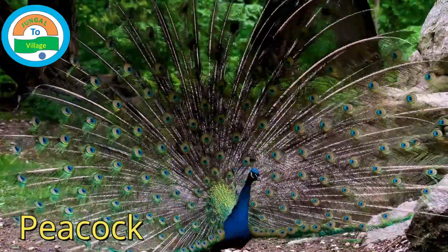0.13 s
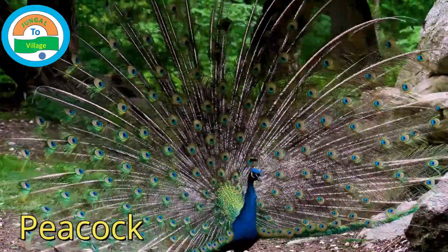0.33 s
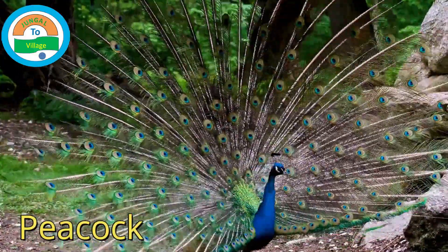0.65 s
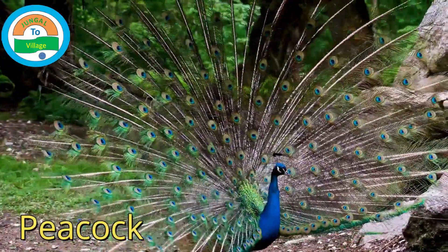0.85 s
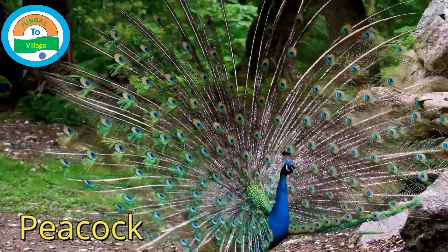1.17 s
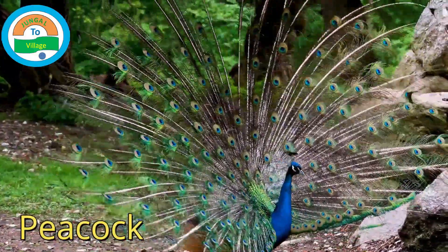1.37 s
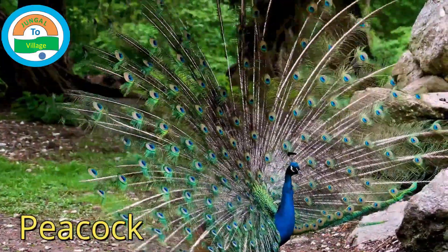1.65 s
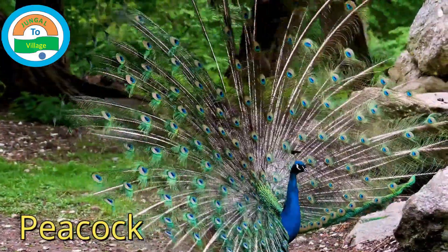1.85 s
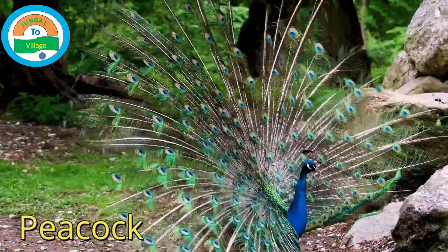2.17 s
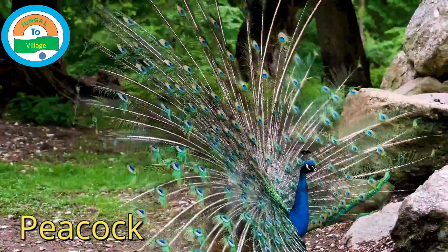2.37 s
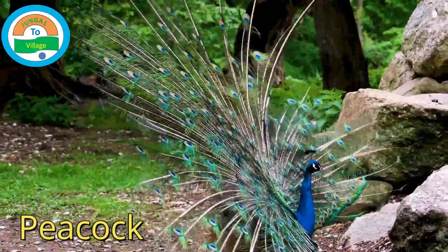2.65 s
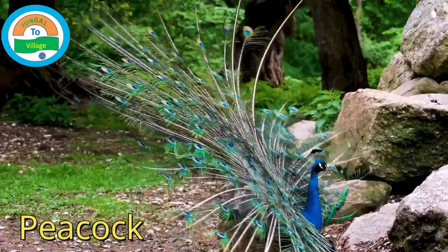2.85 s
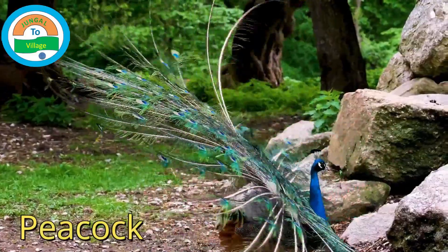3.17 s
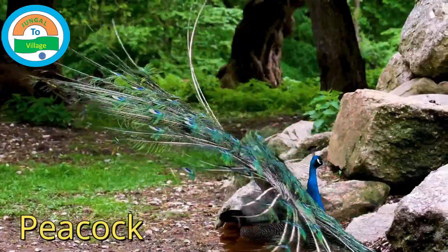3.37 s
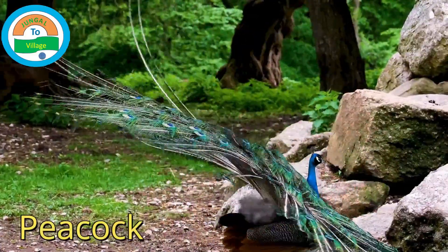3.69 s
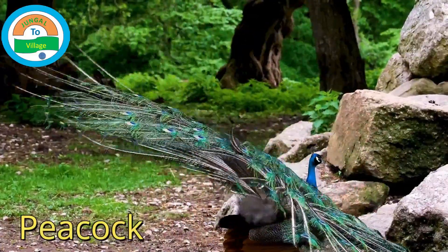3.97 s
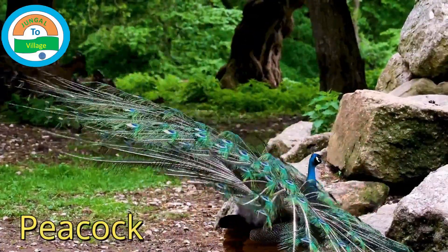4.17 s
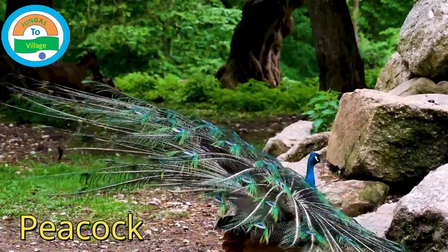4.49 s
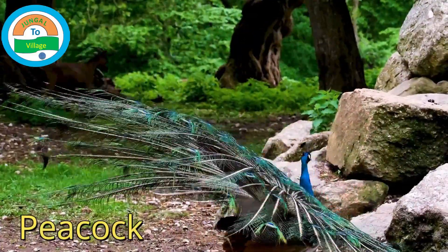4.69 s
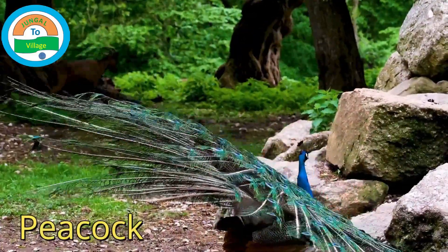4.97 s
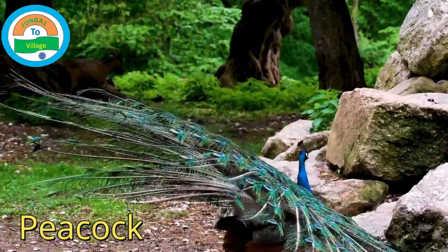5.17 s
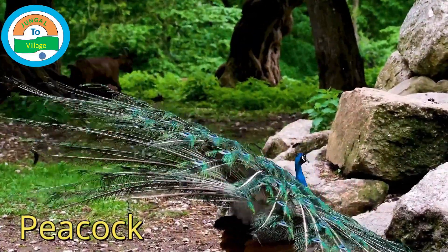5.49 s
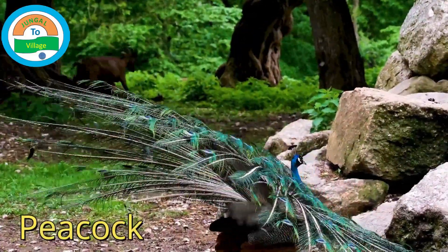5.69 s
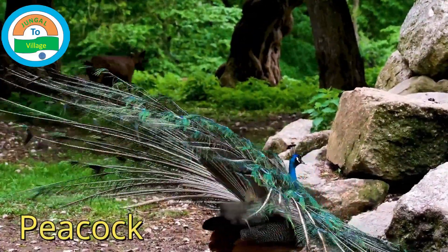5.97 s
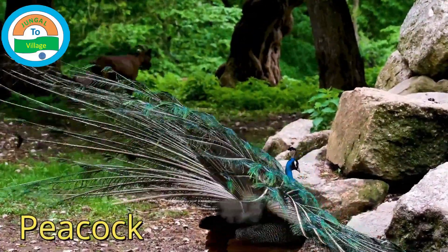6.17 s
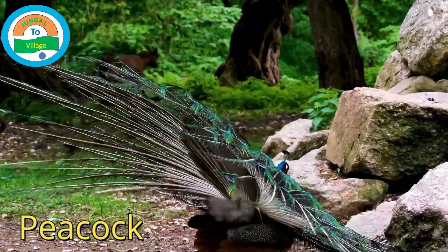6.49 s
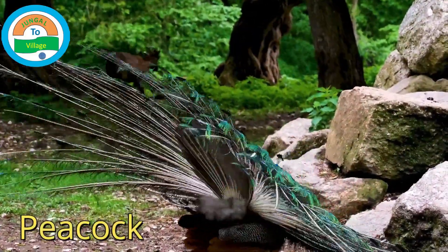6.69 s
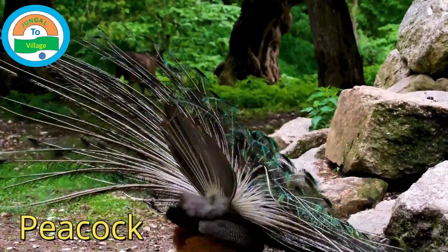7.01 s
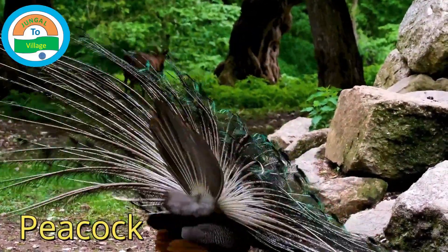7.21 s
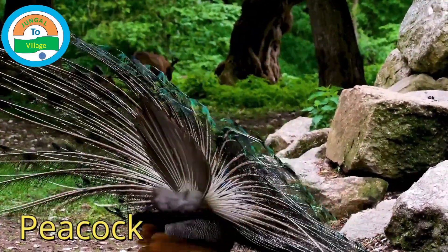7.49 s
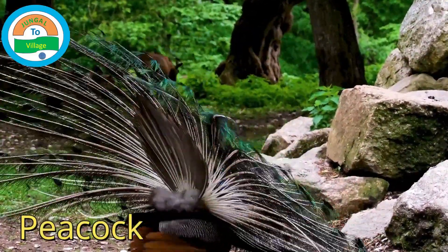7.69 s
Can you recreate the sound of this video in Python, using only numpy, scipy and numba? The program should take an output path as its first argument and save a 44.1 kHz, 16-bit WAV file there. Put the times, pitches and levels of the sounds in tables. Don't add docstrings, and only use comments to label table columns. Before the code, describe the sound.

Faint songbirds whistle over a soft park hush with light wind rumble on the microphone. After a dull tick, a peacock calls six times, almost once a second, each cry starting low, leaping higher and bending down, with trees echoing. Another tick, then one longer, hoarse, quivering cry sounds closer and drier, cut off at the end.

```python
import sys
import numpy as np
from scipy import signal
from scipy.io import wavfile
from scipy.ndimage import uniform_filter1d, map_coordinates
from numba import njit

SR = 44100
rng = np.random.default_rng(int(sys.argv[2]) if len(sys.argv) > 2 else 0)


def linear_from_db(decibels):
    return 10 ** (np.asarray(decibels, float) / 20)


def store_wav(level_fs):
    pcm = np.round(np.clip(np.atleast_2d(level_fs), -1, 1) * 32767)
    wavfile.write(sys.argv[1], SR, pcm.T.astype(np.int16))


N = 346185


def columns(rows, t):
    s, *cols = np.transpose(rows)
    return [np.interp(t, s, c) for c in cols]


def colour_db(table, hz):
    table_hz, table_db = np.transpose(table)
    return np.interp(np.log(hz), np.log(table_hz), table_db)


def walk(rate, size):
    k = max(int(SR / rate), 1)
    held = np.repeat(rng.standard_normal(N // 20), k)[:size]
    return 1.3 * uniform_filter1d(uniform_filter1d(held, k), k)


def bandpass(x, lo_hz, hi_hz):
    return signal.sosfilt(signal.butter(2, [lo_hz, hi_hz], "bandpass", fs=SR, output="sos"), x)


def noise_band(size, lo_hz, hi_hz):
    y = bandpass(rng.standard_normal(size), lo_hz, hi_hz)
    return y / np.std(y)


def span(rows):
    a, b = int(rows[0][0] * SR), min(int(rows[-1][0] * SR), N)
    t = np.arange(a, b) / SR
    runs_on = b >= N - 2
    edge = np.clip(np.minimum((t - t[0]) / .012, (t[-1] - t + runs_on) / .025), 0, 1)
    return slice(a, b), t, edge


def cry(where, edge, hz, levels, jitter=0.0016, shimmer_db=0.83, drift_db=1.5, breath_db=-42, rasp=0.):
    size = len(hz)
    phase = 2 * np.pi * np.cumsum(hz * (1 + jitter * walk(150.9, size))) / SR
    voice = 0
    for k, db in enumerate(levels, 1):
        wobble_db = shimmer_db * k / 2 * walk(59.87, size) + drift_db * walk(21.92, size)
        voice = voice + np.sqrt(2) * linear_from_db(db + wobble_db) * np.sin(k * phase + 0.639 * k * k)
    breath = linear_from_db(levels[1] + breath_db) * noise_band(size, 1000, 1520)
    jump = np.clip(uniform_filter1d(np.gradient(hz), size=1865) * SR / 1500, rasp, 1) ** 2
    breath = breath + jump * linear_from_db(levels[1] - 24) * noise_band(size, 1900, 4800)
    out = np.zeros(N)
    out[where] = edge * (voice + breath)
    return out


def arc(when, manner, colour):
    # (frequency [Hz], level [dB])
    pipe = [(620, -40.5), (700, -39.5), (830, -23.5), (1250, -17), (1650, -13.5), (1900, -19),
            (2200, -15.5), (2480, -21)]
    # (frequency [Hz], level [dB])
    beak = [(2550, -23.5), (2780, -20), (2960, -38), (3180, -28), (3450, -33), (3640, -29), (4200, -28.5),
            (6000, -34.5)]
    beak_shut_db = [-2.5, -18, -13.5, -2, 7, -3]
    start, jump, end, ledge_hz, crest_hz = when
    jump_s, sag_hz, power, ledge_db, arc_db = manner
    start_hz, held_s, third_db, fourth_db, end_db = colour
    climb_s, attack_s, release_s, last_drop_s = .07, 0.046, 0.093, 0.034
    where, t, edge = span([(start,), (end,)])

    def ramp(s, length):
        return np.clip((t - s) / length, 0, 1)

    up = ramp(jump, jump_s)
    sag_start = jump + jump_s + held_s
    sag = ramp(sag_start, end - sag_start) ** power
    hz = start_hz + (ledge_hz - start_hz) * ramp(start, climb_s)
    hz = hz + 20.8 * np.minimum(t - jump, 0)
    hz = hz + (crest_hz - ledge_hz) * np.sqrt(up * up * (3 - 2 * up))
    hz = hz - sag_hz * sag - 30.3 * ramp(end - last_drop_s, last_drop_s)
    hz = uniform_filter1d(hz, size=900)

    effort_db = ledge_db + (arc_db - ledge_db) * up
    effort_db = effort_db - 9.5 * (1 - ramp(start, attack_s)) - 9 * ramp(end - release_s, release_s)
    ledge_fade = ramp(start + attack_s, jump - start - attack_s) * (1 - ramp(jump, jump_s / 4))
    effort_db = effort_db - 2 * ledge_fade + 1.5 * np.sin(np.pi * up) - 3.5 * sag

    levels = [colour_db(pipe, k * hz) for k in range(1, 4)]
    levels[0] = levels[0] - 2.5 * sag
    opened = np.clip(sag / 0.27, 0, 1)
    shut = np.clip((up - 0.26) / 0.17, 0, 1) - 0.85 * opened
    for k, db in enumerate(beak_shut_db):
        levels.append(colour_db(beak, (k + 4) * hz) - 4.5 * k + db * shut)
    flare_db = 0.5 * np.exp(-((up - 0.19) / 0.12) ** 2)
    levels[4:7] = [db + flare_db for db in levels[4:7]]
    levels[2] = levels[2] + third_db * (up - opened) + end_db * sag
    levels[3] = levels[3] + fourth_db * (up - opened) + end_db * sag
    return where, edge, hz, [db + effort_db for db in levels]


def short_cries():
    # (start [s], jump [s], end [s], ledge [Hz], crest [Hz])
    cry_times = [
        (0.845, 0.977, 1.411, 645.5, 817.8),
        (1.759, 1.902, 2.296, 690.6, 823.5),
        (2.638, 2.79, 3.178, 697.6, 806),
        (3.522, 3.675, 4.096, 701.6, 793.7),
        (4.544, 4.692, 5.148, 686.5, 817),
        (5.744, 5.909, 6.389, 667, 806.2),
    ]
    # (jump length [s], sag [Hz], sag power [1], ledge level [dB], arc level [dB])
    manners = [(.12, 160, 1.15, -4.5, -0.5), (.082, 155, 2.7, -1.2, .1), (.096, 160, 1.8, -0.5, -1.36),
               (.117, 135, 2.02, -0.4, -0.8), (.092, 140, 2.4, -1.6, -0.8), (.104, 139, 2.5, -1.5, -1.6)]
    # (start [Hz], crest held [s], crest partial 3 [dB], crest partial 4 [dB], both at the end [dB])
    colours = [(633.4, 0.097, -1, 3, 5.5), (643.5, .001, -6, -5, 6.5), (628.5, 0.00081, 0.5, 1, 4.7),
               (624, 0.00089, 4.5, 2.5, 3.5), (625, 0.00091, 2.5, -1, 5.5), (610, 0.0012, 1.3, 3.5, 4.7)]
    return sum(cry(*arc(*one)) for one in zip(cry_times, manners, colours))


def long_cry():
    # (time [s], level [dB], throat opening [0-1], beak resonance [Hz])
    course = [
        (6.915, -19, 0.01, 3900),
        (6.93, -4, 0.16, 3760),
        (7.04, 3.9, 0.56, 3400),
        (7.075, 2.6, 0.91, 3480),
        (7.2, -2.2, 1.01, 3680),
        (7.34, -4.1, 1.05, 3900),
        (7.41, -0.9, 0.98, 2740),
        (7.56, -1, 0.92, 2770),
        (7.85, -7, 1, 2240),
    ]
    # (time [s], mean pitch [Hz], pitch swing [Hz])
    long_pitch = [(6.915, 639, 9), (7.03, 667, 26), (7.09, 695, 20), (7.13, 699.5, 20), (7.17, 678.4, 16.6),
                  (7.34, 694.3, 12.5), (7.6, 674.5, 17), (7.74, 669, 38.4), (7.85, 654.6, 25)]
    # (time [s], beat advance [turns], loudness depth [0-1])
    flutter = [(6.915, .27, 0.9), (7.03, 0.15, 0.6), (7.17, 0.75, 0.48), (7.27, 0.62, 0.32),
               (7.34, 0.29, 0.61), (7.43, 0.2, 0.14), (7.51, 0.59, 0.36), (7.6, 0.52, 0.29),
               (7.85, 0.057, 0.58)]
    throat_shut_db = [-22.5, -46, -55, -86, -55]
    throat_open_db = [-29.5, -9.5, -32.5, -41.5, -40.5]
    upper_db = [-0.5, 1.5, -7.5, -12, -10]
    flutter_hz, swing_lag_turns, ring_db, ring_width_hz = 47.3, -0.34, 9, 300
    where, t, edge = span(course)
    level_db, opening, ring_hz = columns(course, t)
    hz, swing_hz = columns(long_pitch, t)
    advance, depth = columns(flutter, t)
    *levels, bright_db = [level_db + a + (b - a) * opening for a, b in zip(throat_shut_db, throat_open_db)]
    levels += [bright_db + db for db in upper_db]
    levels = [db + ring_db * np.exp(-((k * hz - ring_hz) / ring_width_hz) ** 2)
              for k, db in enumerate(levels, 1)]
    turn = 2 * np.pi * (flutter_hz * t + advance)
    edge = edge * (1 + depth * np.cos(turn)) / np.sqrt(1 + depth ** 2 / 2)
    hz = hz + swing_hz * np.cos(turn + 2 * np.pi * swing_lag_turns)
    return cry(where, edge, hz, levels, jitter=.0025, shimmer_db=.5, drift_db=.4, breath_db=-31, rasp=.7)


@njit
def trees(x, lags, gain, damp):
    line, soft, out = np.zeros((8, 8192)), np.zeros(8), np.zeros(len(x))
    for i in range(len(x)):
        total = 0.
        for k in range(8):
            soft[k] += (1 - damp) * (gain[k] * line[k, (i - lags[k]) & 8191] - soft[k])
            total += soft[k]
            out[i] += soft[k] * (k % 2 * 2 - 1)
        for k in range(8):
            line[k, i & 8191] = x[i] + soft[k] - total / 4
    return out


def echoes(bird):
    # (time [s], level [dB])
    wood_open = [(0, 0.5), (6.8, -0.5), (6.9, -7.5), (7.85, 1.5)]
    wood_t60_s, near_t60_s, damp, late_s = 2.95, 0.62, 0.42, .16
    far, near = rng.integers(1500, 7000, 8), rng.integers(700, 2600, 8)
    sent = bird + linear_from_db(4.5) * bandpass(bird, 2500, 4500)
    late = np.hanning(int(2 * late_s * SR))
    scatter = late * rng.standard_normal(len(late)) / np.sqrt(np.sum(late ** 2))
    blurred = signal.fftconvolve(sent, scatter)[:N]
    wood = trees(blurred + 1e-18, far, linear_from_db(-60 * far / SR / wood_t60_s), damp)
    rocks = trees(sent + 1e-18, near, linear_from_db(-60 * near / SR / near_t60_s), damp)
    open_db, = columns(wood_open, np.arange(N) / SR)
    return linear_from_db(open_db) * (linear_from_db(-31) * wood + linear_from_db(-19.5) * rocks)


def ticks():
    # (time [s], peak level [dB], frequency [Hz], decay by 60 dB, capped at 0.06 s below [s])
    knocks = [
        (0.758, -37, 1155, 6.0),
        (6.888, -27, 1000, 6.0),
    ]
    out, t = np.zeros(N), np.arange(SR // 10) / SR
    for s, db, hz, t60 in knocks:
        ring = np.sin(2 * np.pi * hz * t) + 0.67 * noise_band(len(t), 290, 1200)
        fade = (1 - np.exp(-t / 0.00044)) * np.exp(-np.log(1000) * t / min(t60, .06))
        out[int(s * SR):int(s * SR) + len(t)] += linear_from_db(db) * ring * fade
    return out


def birds():
    # (time [s], pitch [Hz], level [dB])
    whistles = [
        [(0, 1310, -45), (.04, 1250, -47), (.1, 1260, -67)],
        [(.1, 2800, -68), (.125, 3400, -60), (.15, 3060, -58), (.17, 2730, -55), (.2, 2800, -68)],
        [(.13, 3750, -64), (.155, 3800, -60), (.18, 3780, -66)],
        [(.24, 2800, -66), (.27, 4150, -62), (.305, 3440, -52), (.32, 3400, -68)],
        [(.3, 2700, -60), (.37, 2670, -62), (.52, 2670, -68), (.56, 2600, -62), (.6, 2740, -55),
         (.63, 2350, -64)],
        [(4.39, 4680, -55), (4.42, 3932, -61), (4.45, 3380, -67)],
    ]
    out = np.zeros(N)
    for rows in whistles:
        where, t, edge = span(rows)
        hz, db = columns(rows, t)
        level = linear_from_db(db + 2.3 * walk(93.0, len(t)))
        phase = 2 * np.pi * np.cumsum(hz * (1 + 0.0097 * walk(300., len(t)))) / SR
        out[where] += edge * level * np.sin(phase)
    return out


def air():
    # (frequency [Hz], density [dB per Hz])
    air_spectrum = [(136, -5), (321, -3.5), (570, -1), (796, 0.5), (1410, -10), (1670, -9), (3410, -21.5),
                    (7500, -40)]
    # (time [s], level [dB])
    air_course = [(0, -48), (.26, -49), (.35, -49), (6.7, -51), (6.89, -44), (7.08, -38.5), (7.22, -52.5),
                  (7.85, -45)]
    # (time [s], peak level [dB], half length [s])
    gusts = [(0.155, -54, 0.14), (1.69, -50, 0.086), (2.005, -47, 0.025), (2.13, -52, 0.019),
             (2.598, -49.5, 0.049), (2.916, -55, 0.046), (3.213, -50.5, 0.038), (3.455, -49, 0.16),
             (3.695, -56, 0.048), (4.346, -47, 0.035), (4.52, -51, .06), (4.704, -43.5, 0.068),
             (5.077, -54, 0.06), (5.33, -44, 0.03), (5.487, -51, 0.062), (5.832, -43, 0.092),
             (6.767, -46, 0.069)]
    t = np.arange(N) / SR
    air_db = columns(air_course, t)[0] + 0.64 * walk(10.0, N)
    gust = linear_from_db(-56) + sum(linear_from_db(db) * np.exp(-((t - s) / half) ** 2) for s, db, half in gusts)

    def band_db(f):
        return colour_db(air_spectrum, f) + 10 * np.log10(f)

    hush = 0
    for f in 180 * 2 ** np.arange(0, 5.3, .5):
        flicker_db = 0.2 * walk(6.5, N)
        hush = hush + linear_from_db(band_db(f) - band_db(433) + flicker_db) * noise_band(N, f / 1.18, f * 1.197)
    wind = noise_band(N, 56, 169) * linear_from_db(2 * walk(13.0, N))
    return hush * linear_from_db(air_db - 8.0) + wind * gust


def scene():
    bird = short_cries() + long_cry()
    return (bird + echoes(bird) + ticks() + birds() + air())[None]


def thinned(x):
    band_hz, threshold_db, cut_db = (1650, 4500), (-35, -43), -20
    hz, _, z = signal.stft(x, SR, nperseg=1024, noverlap=768)
    power = uniform_filter1d(uniform_filter1d(np.abs(z) ** 2, size=3, axis=1), size=3, axis=2)
    db = 10 * np.log10(power + 1e-18)
    limit_db = db.max(axis=1, keepdims=True) + np.interp(hz, band_hz, threshold_db)[:, None]
    hidden = np.clip((limit_db - db) / 3, 0, 1)
    hidden = hidden * ((hz > band_hz[0]) & (hz < band_hz[1]))[:, None]
    return signal.istft(z * linear_from_db(cut_db * hidden), SR, nperseg=1024, noverlap=768)[1][:, :N]


def roll_off(x):
    return signal.sosfilt(signal.butter(12, 15680, fs=SR, output="sos"), x)


def record(dry):
    stored_rate, played_rate = 160, 441
    stored = signal.resample_poly(dry, stored_rate, played_rate, axis=1)
    place = np.arange(N) * stored_rate / played_rate
    held = stored[:, place.astype(int)]
    smooth = signal.resample_poly(stored[0], played_rate, stored_rate)
    late = np.arange(N) - (played_rate / stored_rate - 1) / 2
    smooth = map_coordinates(smooth, [late], order=3)[None]
    steps = signal.sosfilt(signal.butter(1, 11100, fs=SR, output="sos"), held - smooth)
    return roll_off(thinned(smooth + steps))


dry = scene()
out = record(dry)
store_wav(out)
```